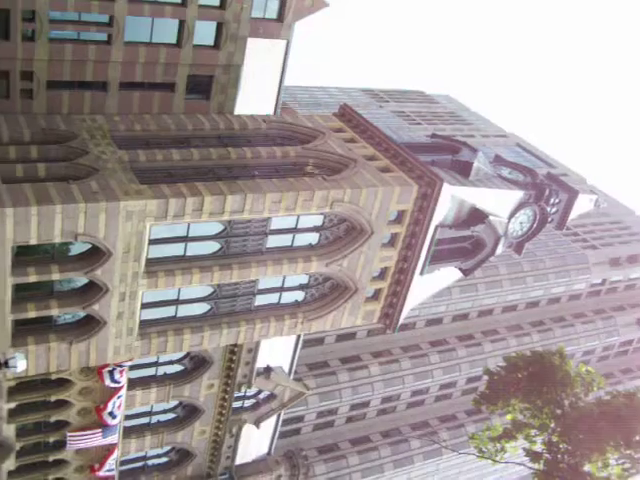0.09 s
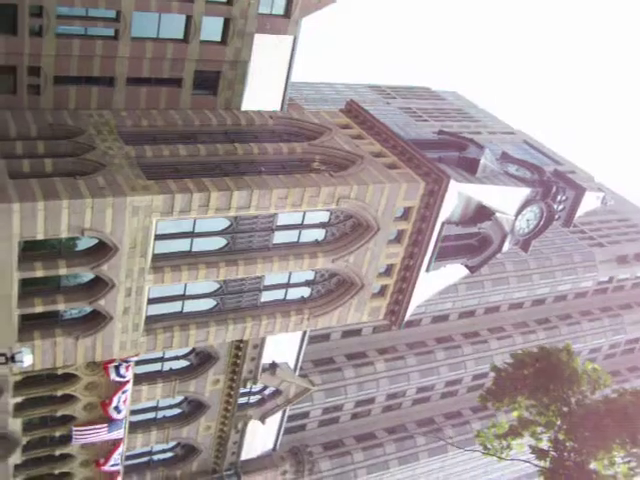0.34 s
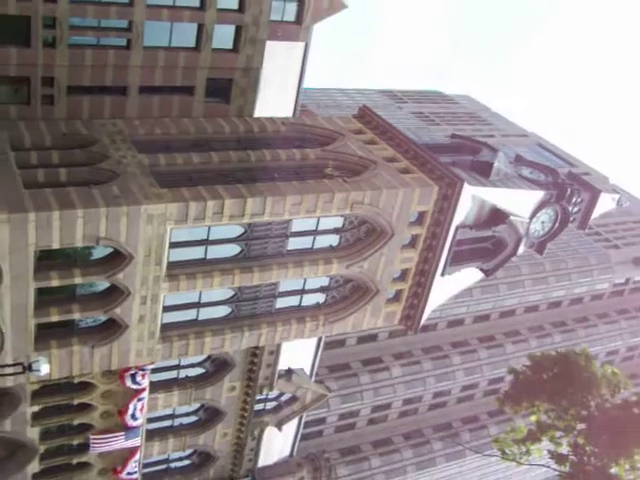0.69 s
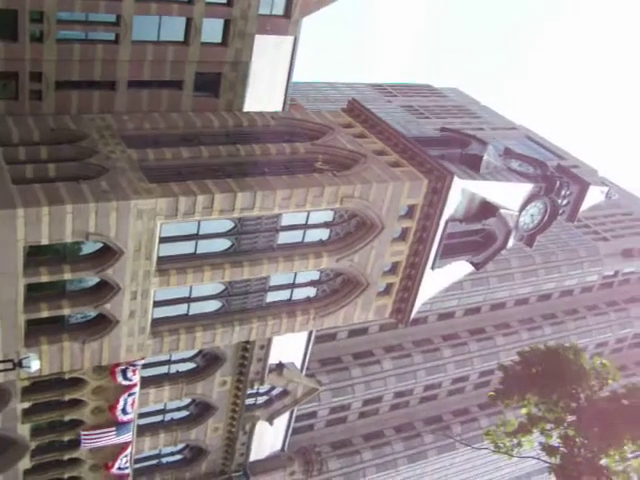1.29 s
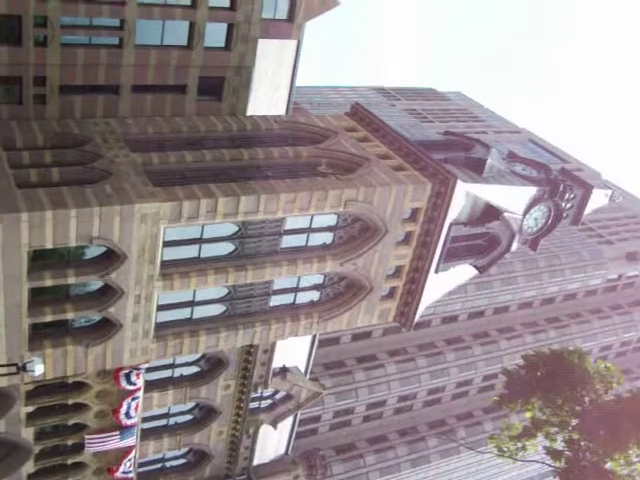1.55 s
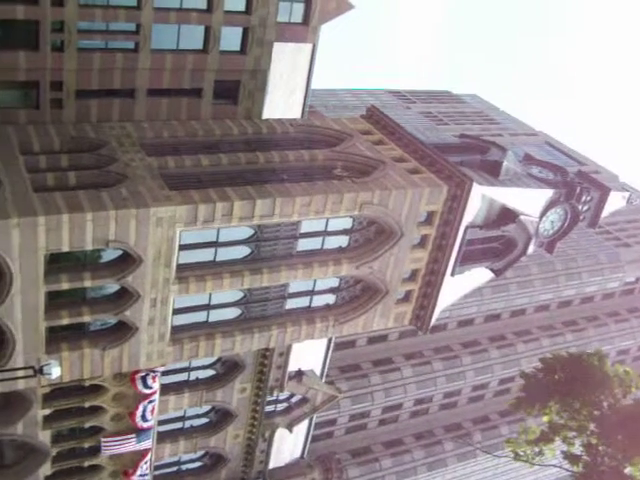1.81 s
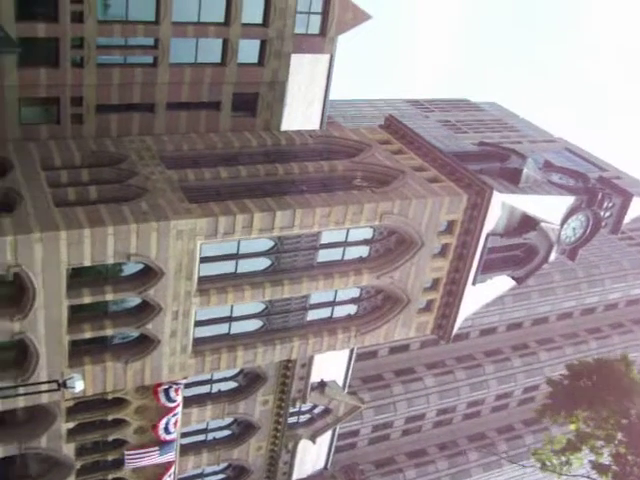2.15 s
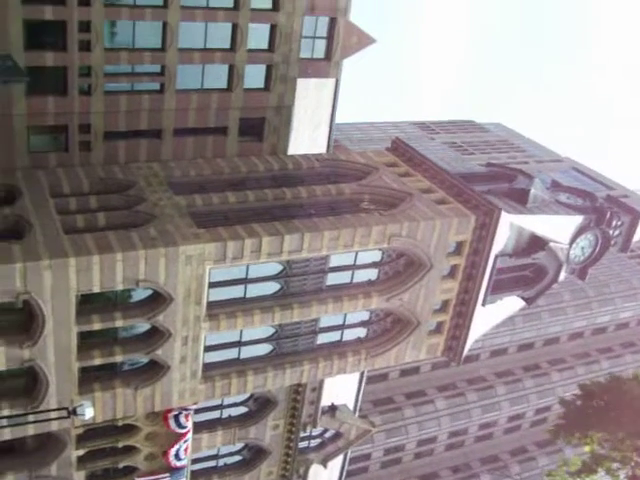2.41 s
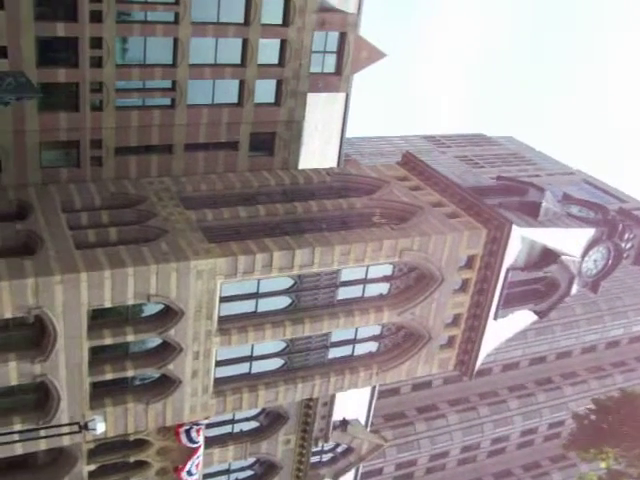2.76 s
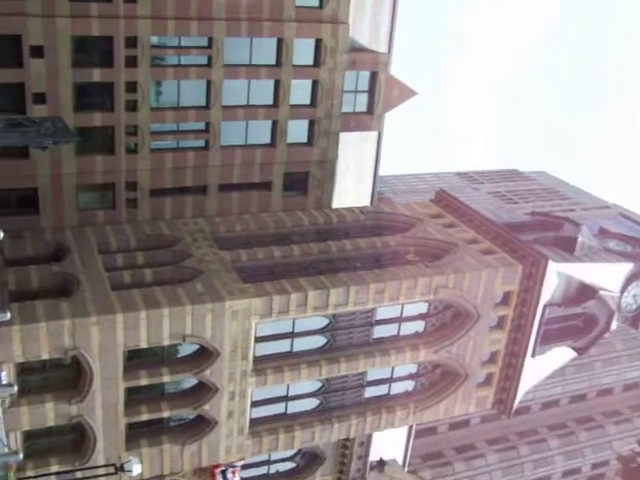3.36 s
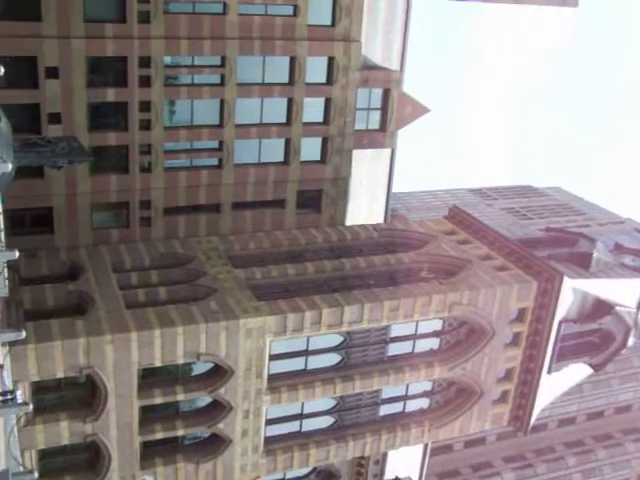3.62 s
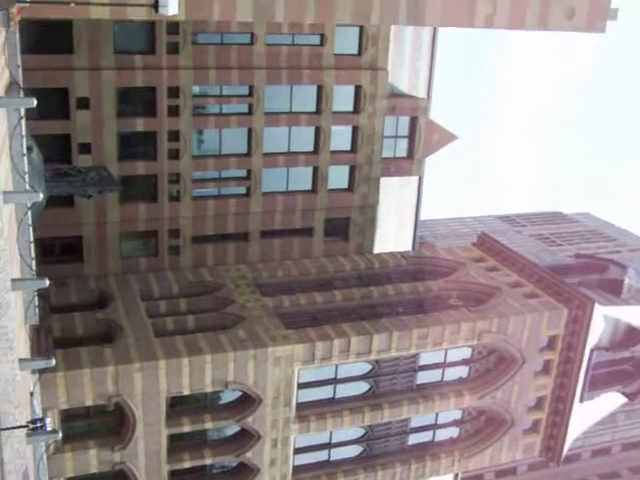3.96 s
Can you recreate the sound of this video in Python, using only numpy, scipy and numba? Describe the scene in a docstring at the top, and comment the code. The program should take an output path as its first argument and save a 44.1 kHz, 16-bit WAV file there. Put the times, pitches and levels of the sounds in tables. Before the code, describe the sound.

A big bell clangs once above a city street, its bright ring echoing off the buildings and fading into a wavering hum. Steady traffic, gusts buffeting the outdoor microphone and an approaching car fill in as it dies away.

```python
"""A city street below a bell tower, heard through one microphone out in the wind.
Overhead a hammer strikes one bell once, while its neighbours still hum from earlier strokes.
House fronts throw the ring back; traffic rushes, a car draws near, and eddies thump the microphone.
The recorder fades in; its gain control ducks at the stroke and lets the street rise again."""
import sys
import numpy as np
from scipy import signal
from scipy.fft import rfft, irfft
from scipy.io import wavfile
from scipy.ndimage import uniform_filter1d
from numba import njit

SR = 44100
rng = np.random.default_rng(int(sys.argv[2]) if len(sys.argv) > 2 else 0)


def bounce(signal):
    """Save signal as a 16-bit WAV file at the path given by the first command-line argument."""
    frames = np.transpose(np.atleast_2d(signal))
    limited = np.clip(frames, -1, 1)
    pcm = np.round(limited * 32767).astype(np.int16)
    wavfile.write(sys.argv[1], SR, pcm)


N = 176400
STRIKE_S = .747


def bell():
    """The struck bell overhead: strong partials, and a shimmer that echoes down the street."""
    age = since(STRIKE_S)
    attack = 1 - np.exp(-age / .018)
    ringing = undb(1) * strong_partials(age) * attack
    shimmer = overtones(age) * attack + hammer(age, attack)
    return ringing + shimmer + house_fronts(shimmer)


def strong_partials(age):
    """Each strong partial of the bell is a beating pair that late reflections swell or cancel."""
    # (frequency [Hz], relative level [dB], t60 [s], signed strength of the reflections [ratio],
    #  their arrival [s], beat rate [Hz], beat depth [0-1])
    partials = [(443.7, -21.5, 18, 1.1, 0.3, 0.39, 0.21), (738.5, -15.5, 2.85, 4.04, 0.45, 0.61, 0.32),
                (1102.2, -25.4, 5.1, 6.43, 0.26, 1.03, 0.17), (1515.1, -14.5, 3.6, -3, 0.42, 0.75, 0.27),
                (1969.6, -18.1, 2.63, -6.0, 0.32, 0.94, 0.32),
                (2452.8, -18.2, 2.37, 2.49, 0.15, 1.07, 0.27), (2957.1, -8.5, 3.15, 0.3, 0.08, 1.07, 0.25),
                (3474.8, -10.5, 1.66, 3.97, 0.6, 0.84, 0.52), (4003.2, -18, 1.9, -6, 0.2, 0.72, 0.6),
                (4210.8, -31.4, 2.65, 2.62, 0.05, 0.45, 0.7), (4536.4, -20.9, 3.71, -1.89, 0.07, 0.31, 0.7),
                (5074.4, -31.1, 1.21, 6.72, 0.25, 0.8, 0.55), (5612.6, -27.8, 1.09, 8.0, 0.44, 4.0, 0.17)]
    out = 0
    for hz, db, t60, reflected, arrival_s, beat_hz, depth in partials:
        mode = np.exp(2j * np.pi * (hz * age + rng.random()))
        pair = mode * (1 + depth * np.exp(2j * np.pi * beat_hz * age))
        arrived = age ** 4 / (age ** 4 + arrival_s ** 4)  # rises smoothly from 0 to 1
        out += undb(db) * pair.imag * ring(age, t60) * (1 + reflected * arrived)
    return out


def overtones(age):
    """The bell's weak partials; the higher ones die sooner."""
    # weak modes of the bell: (frequency [Hz], level [dB])
    modes = [(935.9, -23), (950.5, -24.5), (1220.3, -41), (1534.4, -23.5), (1611.8, -31), (1676.4, -25),
             (1725.5, -21.5), (1849.8, -35.5), (2138.9, -33.5), (2710, -27.5), (3035.2, -29), (3093.9, -16),
             (3142.3, -19), (3366.1, -25), (3453.2, -20), (3608.5, -28.5), (3814.6, -13.5), (3872.3, -25.5),
             (4174.1, -18), (4368.4, -26), (4442.1, -25), (4589.1, -23.5), (4632, -24), (4802.7, -25.5),
             (4899.1, -27), (5034.1, -31), (5219.4, -28.5), (5372.2, -30), (5545.3, -30), (5824.2, -32),
             (6149.2, -32), (6319, -40), (7216.3, -44.5)]
    out = 0
    for hz, db in modes:
        t60 = 2.83 * (2040 / hz) ** .94
        out += undb(db) * tone(hz, age) * ring(age, t60)
    return out


def hammer(age, attack):
    """The hammer lands with a quick crack and a longer clang that builds with the bell's attack."""
    # spectrum of the blow: (frequency [Hz], relative density [dB])
    blow = [(150, -14), (400, -9.5), (900, -3.5), (1800, -1.5), (3000, -1), (4400, -2.5), (5500, -16.5),
            (7000, -23.5), (8500, -47.5)]
    crack = undb(-12) * noise(blow) * ring(age, t60=.25) * (1 - np.exp(-age / .004))
    clang = undb(-8.5) * noise(blow) * ring(age, t60=.5) * attack
    return crack + clang


def house_fronts(sound, first_echo_s=.049):
    """The walls along the street return a diffuse echo."""
    t = since(0)
    tail = rng.standard_normal(N) * ring(t, t60=1.5) * (t > first_echo_s)
    return undb(-3.5) * signal.fftconvolve(sound, tail / np.linalg.norm(tail))[:N]


def neighbour_bells():
    """The other bells hum on from earlier strokes, wavering slowly."""
    # partials still ringing: (frequency [Hz], level at the stroke [dB], t60 [s])
    hums = [(231.2, -30, 23), (277.3, -24, 15.7), (312, -24, 20.3), (335.2, -31.5, 16), (368.8, -30.5, 85),
            (448, -28, 66), (558.7, -26.5, 14.2), (623, -30.5, 5.2), (783, -35.5, 4), (832, -32.5, 6.9),
            (933, -31, 14), (1227, -38, 6.2), (1660, -28.5, 4.1), (2085, -39.5, 2.7), (2507, -37.5, 2),
            (2820, -41, 6)]
    age = np.arange(N) / SR - STRIKE_S  # negative before the stroke
    out = 0
    for hz, db, t60 in hums:
        waver_db = .73 * drift(rate_hz=1.5)
        out += undb(db + waver_db) * tone(hz, age) * ring(age, t60)
    return out


def traffic():
    """The steady rush of city traffic, its level wandering slightly."""
    # spectrum of the traffic: (frequency [Hz], relative density [dB])
    rush = [(25, -8.5), (60, -1), (150, -0.5), (300, -10.5), (550, -9.5), (1000, -11), (1700, -13.5),
            (2500, -15.5), (3800, -14), (5000, -25.5), (6300, -33.5), (7500, -38.5), (8600, -60)]
    return noise(rush) * undb(-23.5 + .4 * drift(rate_hz=8))


def approaching_car(nearest_s=4.16, swell_s=.95):
    """Tyre noise grows as one car closes on the microphone."""
    # spectrum of the tyres: (frequency [Hz], relative density [dB])
    tyres = [(200, -11.5), (600, -6.5), (1000, -4), (1700, 0), (2500, -8.5), (4000, -9.5), (6000, -25.5),
             (8500, -50)]
    nearness = 1 / (1 + ((since(0) - nearest_s) / swell_s) ** 2)
    return undb(-22) * noise(tyres) * nearness


def taps():
    """Two light taps in the street, each a short burst of band noise."""
    # taps: (time [s], centre [Hz], bandwidth [Hz], level [dB])
    clinks = [(2.095, 2920, 300, -22), (3.042, 2700, 1800, -16)]
    out = 0
    for start, hz, width, db in clinks:
        age = since(start)
        band = [(hz / 4, -40), (hz - width / 2, -6), (hz, 0), (hz + width / 2, -6), (2 * hz, -40)]
        attack = 1 - np.exp(-(age / .003) ** 2)
        out += undb(db) * noise(band) * ring(age, t60=.05) * attack
    return out


def wind():
    """Gusty rumble right on the microphone; single eddies thump it for a cycle or a few."""
    # spectrum of the wind: (frequency [Hz], relative density [dB])
    rumble = [(20, -5.5), (50, -9.5), (100, -0.5), (170, -1.5), (300, -3.5), (700, -36), (2000, -79)]
    # strength of the breeze: (time [s], level [dB])
    breeze = [(.4, -26), (.7, -25), (.95, -41.5), (1.25, -30.5), (1.65, -27.5), (2.2, -26.5), (2.45, -27.5),
              (2.75, -27.5), (3.1, -26), (3.55, -28), (3.9, -29)]
    # eddies: (time [s], half length [s], pitch [Hz], level [dB])
    buffets = [(1.635, 0.0093, 130, -14), (2.471, 0.0046, 129, 0), (2.53, 0.013, 104, -10.5),
               (2.55, 0.0086, 139, -2.5), (2.563, 0.016, 102, -4), (3.113, .014, 69.6, -12.5),
               (3.783, 0.0087, 91, -14.5), (3.831, 0.0085, 90, -13), (3.922, 0.01, 90, -11.5)]
    t = since(0)
    breeze_db = np.interp(t, *np.array(breeze).T)
    out = noise(rumble) * undb(breeze_db + 2.2 * drift(rate_hz=30))
    churn = .3 * noise(rumble)
    for centre, half_length, hz, db in buffets:
        swell = np.exp(-((t - centre) / half_length) ** 2)
        out += undb(db) * swell * (tone(hz, t - centre) + churn)
    return out


def undb(db):
    """Decibels to gain."""
    return 10 ** (np.asarray(db) / 20)


def since(start):
    """Seconds since a moment, zero before it."""
    return np.maximum(np.arange(N) / SR - start, 0)


def ring(age, t60):
    """Exponential decay, 60 dB down after t60 seconds."""
    return np.exp(-np.log(1000) * age / t60)


def tone(hz, age):
    """A sine of random phase."""
    return np.sin(2 * np.pi * (hz * age + rng.random()))


def noise(spectrum):
    """Noise of rms 1, shaped by points of (frequency [Hz], relative density [dB])."""
    hz, db = np.array(spectrum, float).T
    bins_hz = np.maximum(np.arange(N // 2 + 1) * SR / N, 1)
    gain = undb(np.interp(np.log(bins_hz), np.log(hz), db))
    low_cut = np.minimum(bins_hz / hz[0], 1)
    shaped = irfft(rfft(rng.standard_normal(N)) * gain * low_cut, N)
    return shaped / shaped.std()


def drift(rate_hz):
    """Smooth random drift of rms 1."""
    hold = int(SR / rate_hz)
    steps = np.repeat(rng.standard_normal(N // hold + 2), hold)
    smooth = uniform_filter1d(uniform_filter1d(steps, hold), hold)[:N]
    return smooth / np.sqrt(np.mean(smooth ** 2))


@njit
def follow(power, attack_s, release_s):
    """Envelope follower with separate times for rise and fall."""
    out, level = np.empty(len(power)), 0.
    for i in range(len(power)):
        lag_s = attack_s if power[i] > level else release_s
        level += (power[i] - level) / (lag_s * SR)
        out[i] = level
    return out


def gain_control(sound, threshold_db=-18.5, ratio=5.9, ahead_s=.004, bass_hz=230):
    """The recorder turns loud sound down, looking slightly ahead and ignoring the bass."""
    t = since(0)
    sensed = signal.sosfilt(signal.butter(2, bass_hz, "high", fs=SR, output="sos"), sound)
    power = uniform_filter1d(sensed ** 2, size=441)  # 10 ms average
    held = follow(power, attack_s=.018, release_s=.12)
    rms_ahead = np.sqrt(np.abs(np.interp(t + ahead_s, t, held)))
    excess = np.maximum(rms_ahead / undb(threshold_db), 1)
    return sound * excess ** (1 / ratio - 1)


def scene():
    """Bells above, the street around and wind on the microphone, in mono."""
    return (bell() + neighbour_bells() + traffic() + approaching_car() + taps() + wind())[None]


def record(dry):
    """The recorder fades in, rides the gain, rounds the peaks and cuts the top steeply."""
    # fade-in of the recorder: (time [s], gain [dB])
    fade = [(.336, -28.5), (.5, -18), (.65, -9.5), (.75, -1.5)]
    start_s, ceiling, top_hz = .3356, .78, 8700
    t = since(0)
    fade_in = undb(np.interp(t, *np.array(fade).T)) * (t > start_s)
    ducked = gain_control(dry[0] * fade_in)
    rounded = ducked / (1 + (ducked / ceiling) ** 6) ** (1 / 6)
    top_cut = signal.ellip(8, .2, 80, top_hz, fs=SR, output="sos")
    return signal.sosfilt(top_cut, rounded)[None]


dry = scene()
out = record(dry)
bounce(out)
```